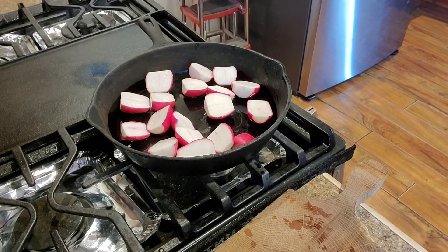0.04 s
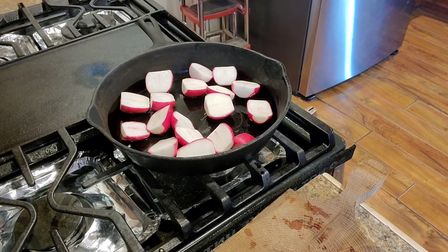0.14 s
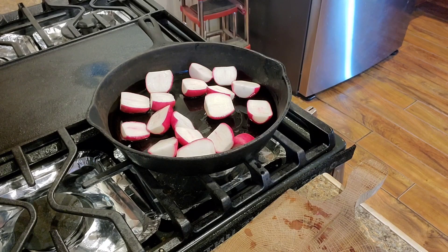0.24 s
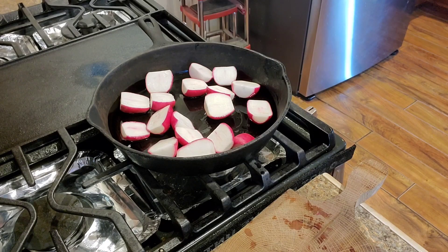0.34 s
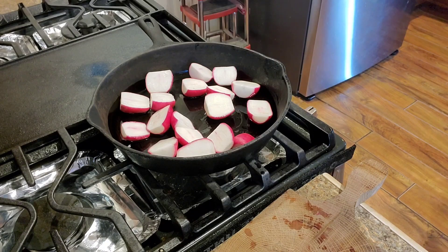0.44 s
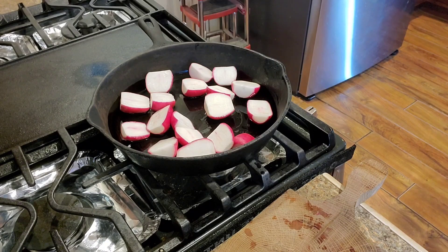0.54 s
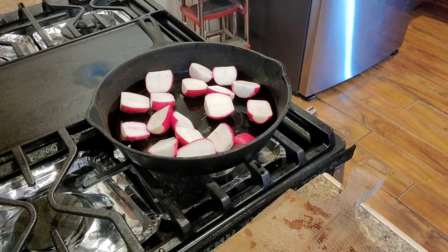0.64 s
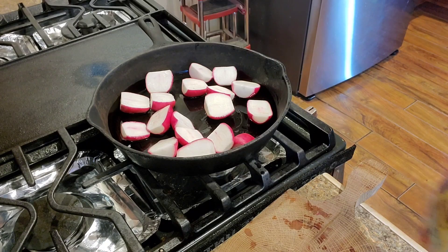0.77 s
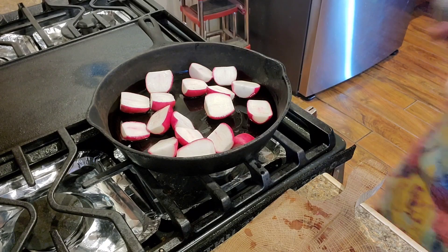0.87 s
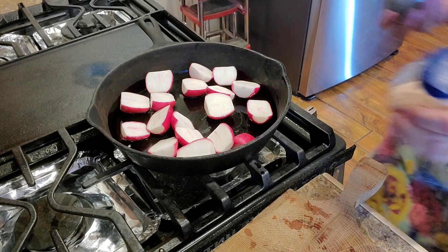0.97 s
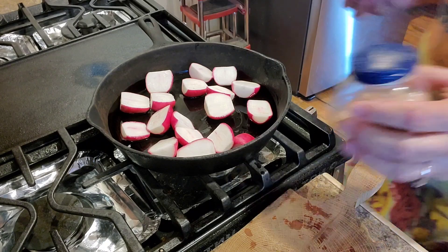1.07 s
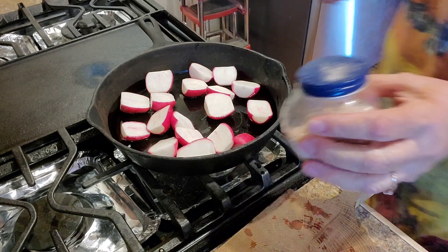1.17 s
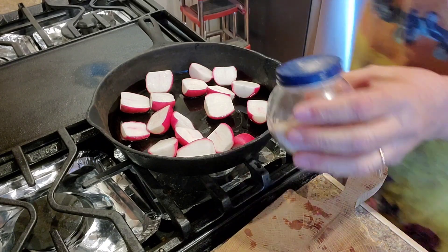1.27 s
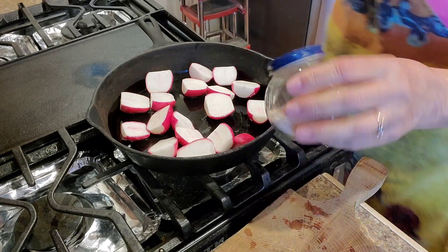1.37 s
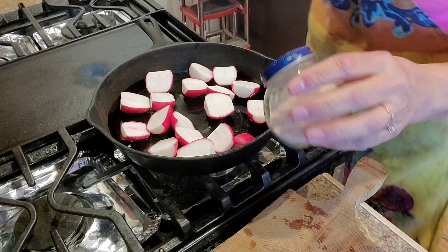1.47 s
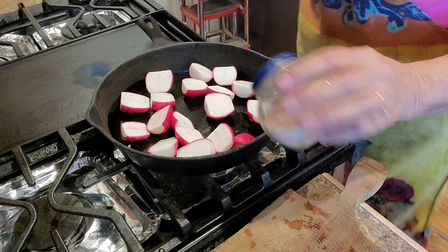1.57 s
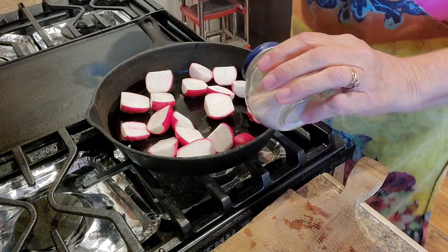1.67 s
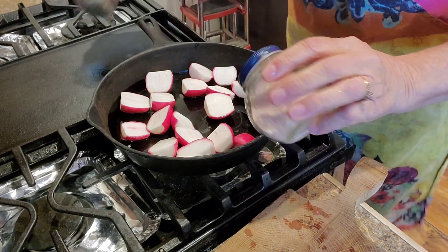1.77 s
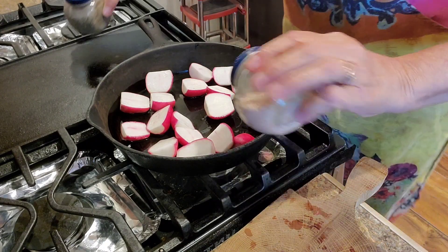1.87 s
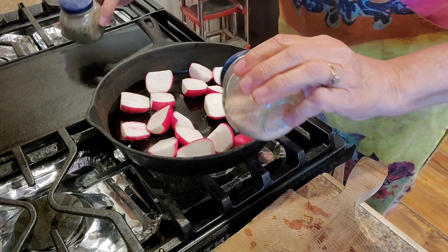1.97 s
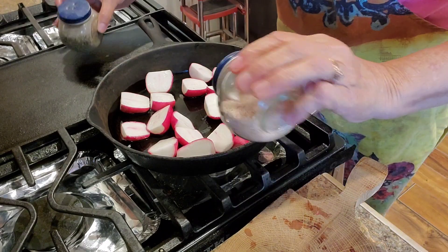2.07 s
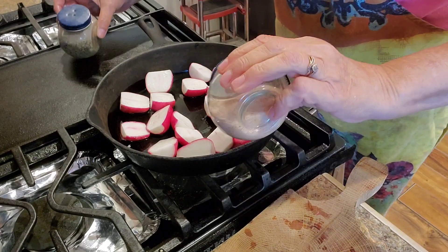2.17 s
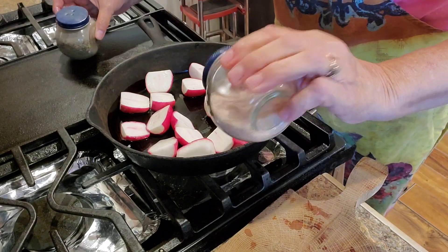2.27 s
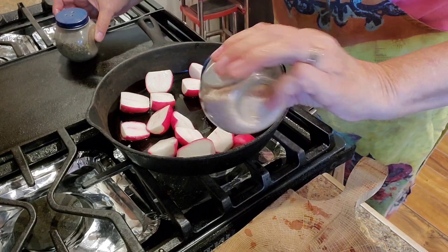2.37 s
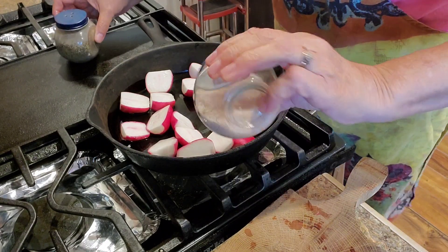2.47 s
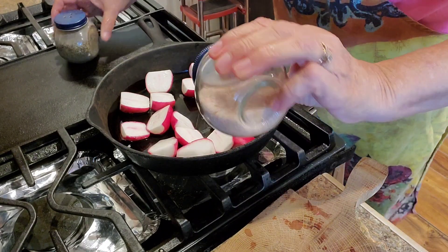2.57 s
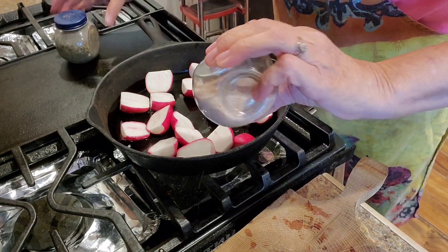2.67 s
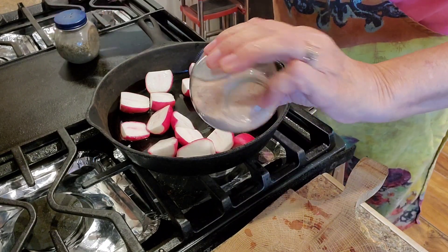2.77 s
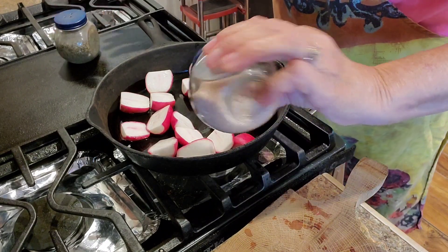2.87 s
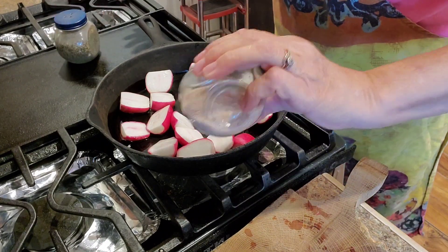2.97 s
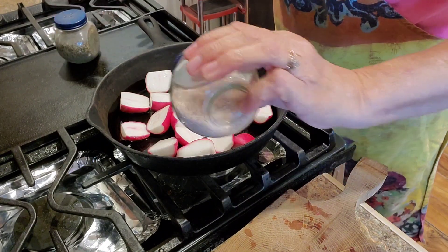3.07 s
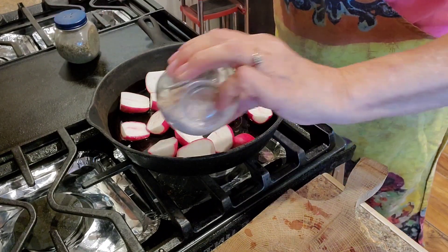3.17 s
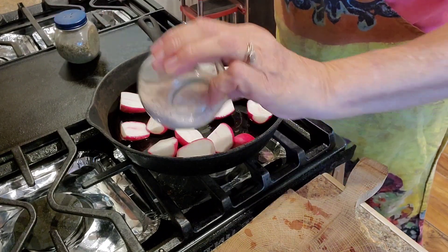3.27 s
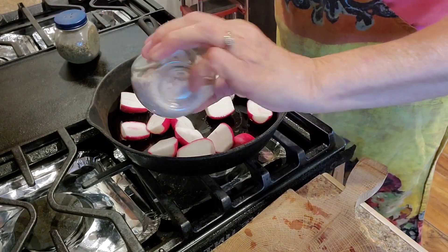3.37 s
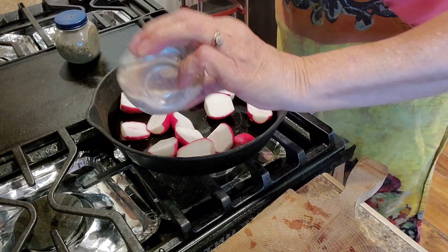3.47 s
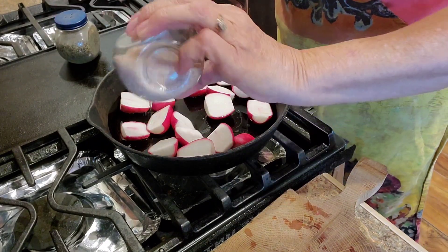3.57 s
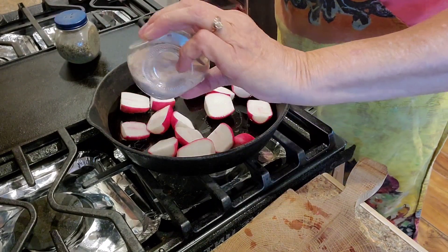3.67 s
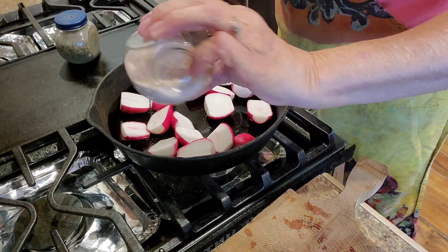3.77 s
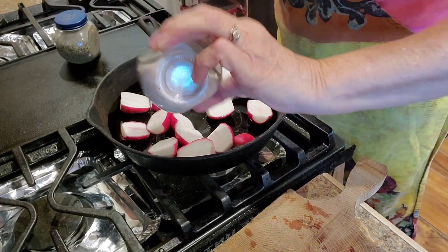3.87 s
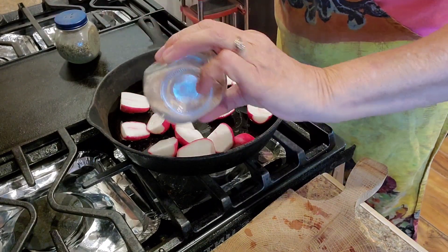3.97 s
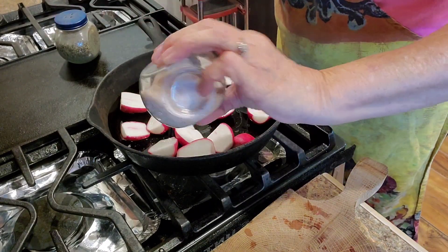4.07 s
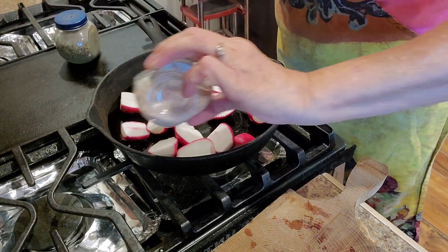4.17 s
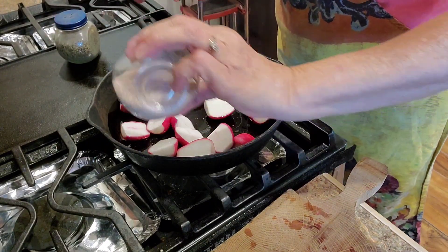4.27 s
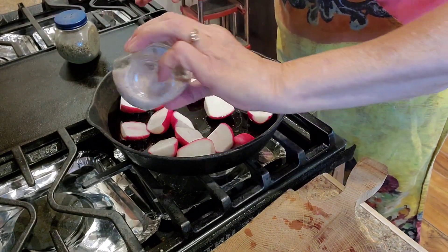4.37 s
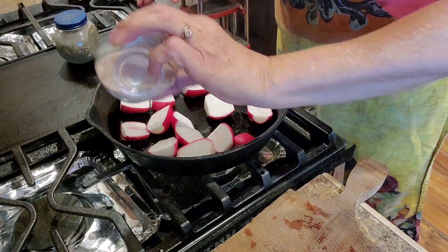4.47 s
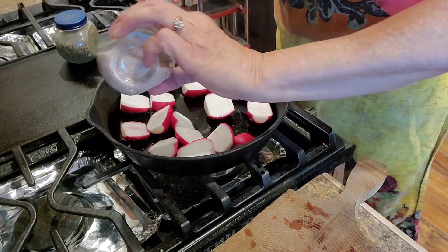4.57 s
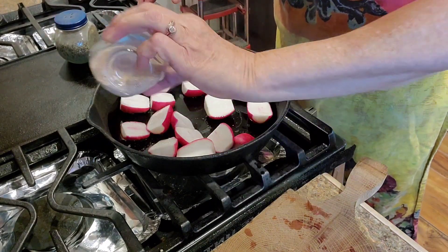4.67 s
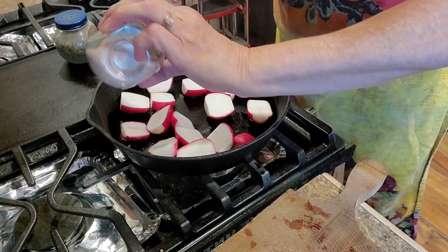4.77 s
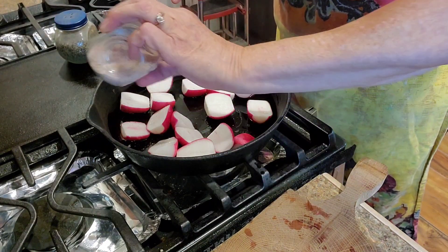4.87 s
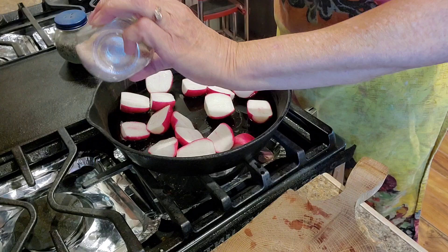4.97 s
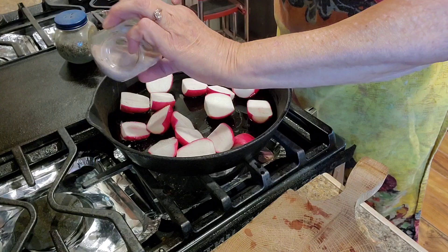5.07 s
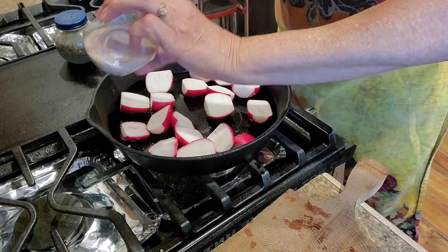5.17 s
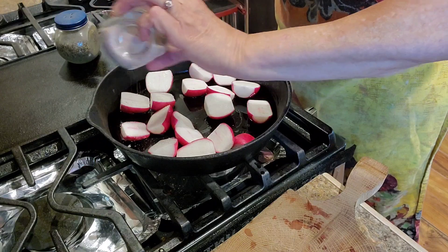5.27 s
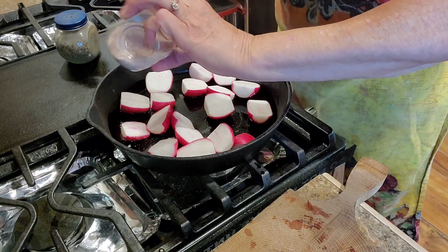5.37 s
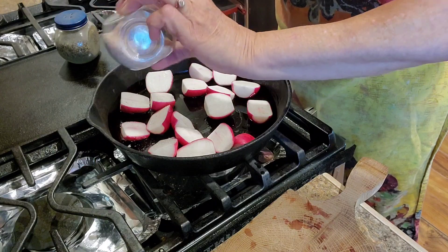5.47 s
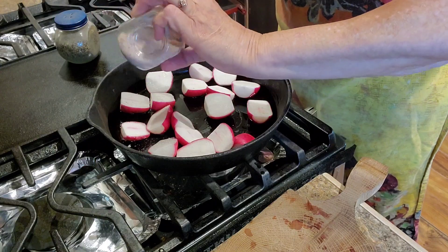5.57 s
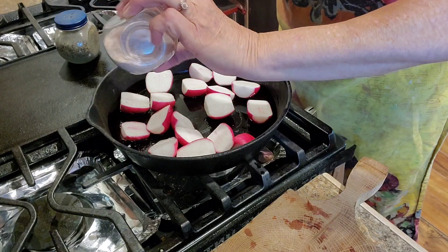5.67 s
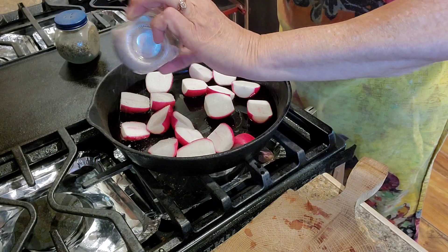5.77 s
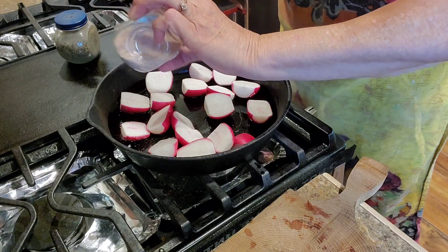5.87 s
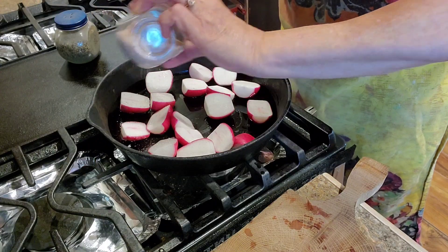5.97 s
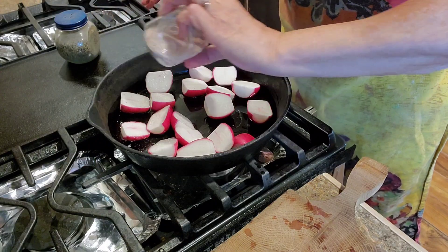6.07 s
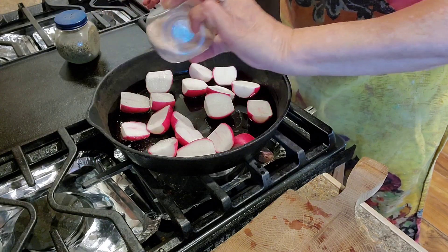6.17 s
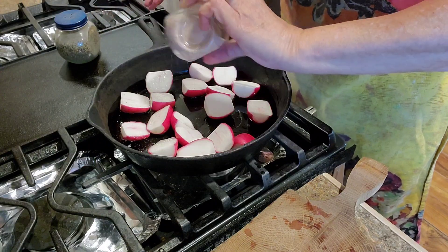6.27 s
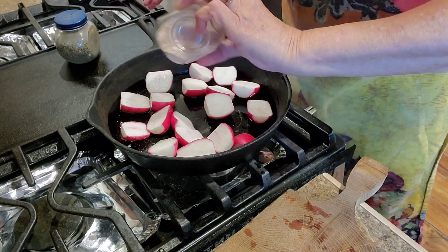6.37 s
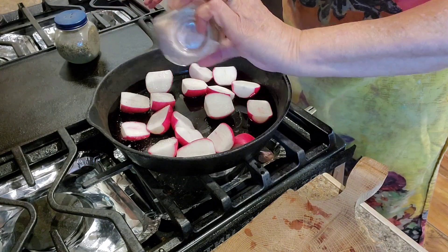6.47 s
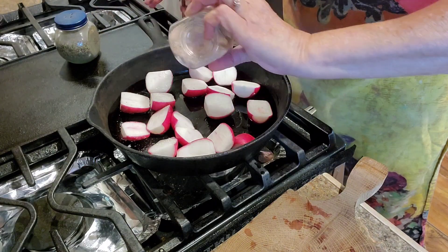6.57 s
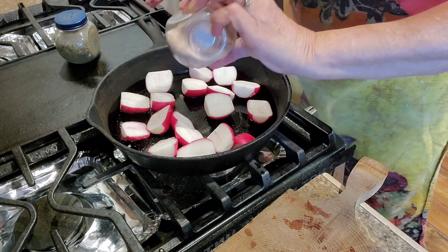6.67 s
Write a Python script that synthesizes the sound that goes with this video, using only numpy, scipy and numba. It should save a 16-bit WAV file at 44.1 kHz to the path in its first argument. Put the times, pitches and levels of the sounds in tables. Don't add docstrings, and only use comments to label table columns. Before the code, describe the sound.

Cupboard knocks and a latch click, then a glass jar of dry grains slides, a jar clanks hard on iron, and brisk rhythmic shaking follows.

```python
import sys
import numpy as np
from scipy import signal
from scipy.io import wavfile
from scipy.ndimage import uniform_filter1d
from numba import njit

SR = 44100
rng = np.random.default_rng(int(sys.argv[2]) if len(sys.argv) > 2 else 0)


def unload_wav(signal):
    wavfile.write(
        sys.argv[1],
        SR,
        np.round(np.clip(np.atleast_2d(signal).T, -1, 1) * 32767).astype(np.int16),
    )


def volts_from_decibels(level):
    exponent = np.asarray(level, float) / 20
    return 10 ** exponent


N = 296771
TIME = np.arange(N) / SR


def unit(x):
    return x / np.sqrt(np.mean(x ** 2))


def band(x, hz, width):
    return signal.lfilter(*signal.iirpeak(min(hz, .45 * SR), hz / width, fs=SR), x)


def resonances(x, peaks):
    return unit(sum(volts_from_decibels(db) * unit(band(band(x, hz, w), hz, w)) for hz, w, db in peaks))


def walk(rate):
    hold = int(SR / rate)
    steps = np.repeat(rng.standard_normal(N // hold + 1), hold)
    return uniform_filter1d(steps, hold)[:N]


def butter(x, order, hz, kind="low"):
    return signal.sosfilt(signal.butter(order, hz, kind, fs=SR, output="sos"), x)


# arrival_s, hold_s, first_db, last_db, air_minus_glass_db
SLIDES = [
    (1.215, 0.17, -35, -30, -36.5),
    (1.61, 0.19, -46, -47, -21),
    (1.772, 0.1, -35, -31.5, -26),
    (1.906, 0.035, -22, -26.5, -19),
]
# arrival_s, hold_s, first_db, last_db, air_minus_glass_db
SHAKES = [(2.138, 0.045, -25.5, -31.5, -22), (2.35, 0.041, -36.5, -26, 2.5), (2.608, .055, -39, -33, -19.5),
          (2.86, 0.046, -42, -33.5, -35), (2.925, 0.02, -35, -41, -38), (2.982, 0.011, -33.5, -36.5, -45),
          (3.048, 0.039, -39.5, -46, -42), (3.11, 0.055, -42.5, -35.5, -28),
          (3.165, 0.049, -39.5, -42, -33.5), (3.368, 0.064, -41.5, -42.5, -33.5),
          (3.6, 0.036, -31.5, -26.5, -14.5), (3.846, 0.08, -27, -33.5, -26.5),
          (4.106, 0.058, -22.5, -28.5, -19), (4.324, 0.063, -34, -23.5, -17),
          (4.572, 0.047, -24, -21, -16.5), (4.798, 0.047, -20, -24, -17), (5.02, 0.05, -26, -25, -16),
          (5.245, 0.046, -27, -26, -10.5), (5.464, 0.075, -33, -26, -14.5),
          (5.74, 0.046, -33, -26.5, -21.5), (6.0, 0.055, -30, -31, -17), (6.22, 0.069, -37.5, -27, -14),
          (6.465, 0.059, -24.5, -24, -12.5), (6.716, .014, -37.5, -32, -8.5)]
# throw_s, late_s, note_hz, rise_octaves, swell_db
AIR_NOTES = [(1.6, .009, 952, 0.17, -5), (2.14, 0.016, 834, 0.055, 2), (2.9, .005, 893, .1, 3),
             (3.6, 0.0052, 897, 0.063, -3.5), (3.85, 0.012, 865, 0.041, -4), (4.1, 0.0054, 881, 0.022, -8),
             (4.33, 0.0026, 903, 0.087, -5), (4.57, .002, 927, 0.097, 0), (4.8, .002, 827, .1, -9.5),
             (5.02, 0.011, 799, .02, -7.5), (5.25, 0.016, 857, .1, -2.5), (5.47, 0.016, 997, 0.28, 1.5),
             (5.74, 0.0099, 964, .2, -5), (6.0, 0.0054, 1054, 0.23, 0), (6.22, 0.027, 1112, 0.025, -8),
             (6.47, 0.021, 1031, .02, -8.5), (6.72, .005, 1034, .1, 0.5)]
# throw_s, ahead_s, under_throw_db
LEADS = [(1.2, 0.016, -16.5), (1.6, 0.028, -14.5), (1.77, .035, -7), (1.9, .02, -9), (2.14, 0.014, -24.5),
         (2.6, .015, -14), (2.86, .025, -10), (2.98, .03, -9.5), (3.05, .02, -8), (3.11, .03, -9),
         (3.37, .015, -8), (3.6, .015, -20), (3.85, 0.011, -20), (4.1, 0.015, -20.5), (4.33, .015, -17.5),
         (4.57, 0.022, -19.5), (4.8, 0.017, -21), (5.02, 0.019, -21), (5.25, 0.018, -17.5),
         (5.47, 0.0056, -21.5), (5.74, 0.021, -16.5), (6.0, 0.024, -16.5), (6.22, 0.018, -18.5),
         (6.47, .01, -18)]
SLIDE_ATTACK_S, SHAKE_ATTACK_S, ATTACK_DB = 0.086, 0.051, -52
SLIDE_RELEASE_S, SHAKE_RELEASE_S, RELEASE_DB = .09, 0.068, -32
TRICKLE_S, TRICKLE_DB = 0.017, -39
SETTLE_S, SETTLE_DB = .09, -55.5
PACKING_S, AIR_LAG_S = .07, 0.0058


def grain_flow():
    glass_db, air_db = np.full(N, -90.), np.full(N, -120.)
    note_hz = np.full(N, 900.)
    slides, shakes = (SLIDES, SLIDE_ATTACK_S, SLIDE_RELEASE_S), (SHAKES, SHAKE_ATTACK_S, SHAKE_RELEASE_S)
    for throws, attack_s, release_s in (slides, shakes):
        for s, hold_s, first_db, last_db, cavity_db in throws:
            _, late_s, hz, rise_oct, swell_db = min(AIR_NOTES, key=lambda row: abs(row[0] - s))
            _, ahead_s, ahead_db = min(LEADS, key=lambda row: abs(row[0] - s))
            times = s + np.cumsum([-ahead_s - attack_s / 2, attack_s / 2, ahead_s, hold_s,
                                   release_s, TRICKLE_S, SETTLE_S])
            levels = [first_db + ATTACK_DB, first_db + ahead_db, first_db, last_db,
                      last_db + RELEASE_DB, last_db + TRICKLE_DB, last_db + SETTLE_DB]
            throw_db = np.interp(TIME, times, levels, left=-90, right=-90)
            glass_db = np.maximum(glass_db, throw_db)
            packing = np.clip(2 * (TIME - s - late_s) / PACKING_S - 1, -1, 1)
            note_hz = np.where(TIME > times[0], hz * 2 ** (rise_oct * packing), note_hz)
            delays = [late_s, late_s, min(late_s, hold_s), AIR_LAG_S, AIR_LAG_S, AIR_LAG_S, AIR_LAG_S]
            answer_db = np.interp(TIME, times + delays, levels, left=-90, right=-90)
            air_db = np.maximum(air_db, cavity_db + swell_db * packing + answer_db)
    return glass_db, air_db - glass_db, note_hz


GRAINS_PER_S, GRAIN_SPREAD_DB = 8100, 0.5


def grain_ticks(tumble):
    fall, size = rng.random(N), rng.exponential(size=N)
    size_db = GRAIN_SPREAD_DB * size + 1.4 * walk(220) + 1.2 * walk(70)
    ticks = (fall < GRAINS_PER_S / SR) * volts_from_decibels(tumble * size_db)
    return ticks / np.sqrt(uniform_filter1d(ticks ** 2, size=SR // 8))


# pitch_hz, width_hz, level_db
GLASS = [(4320, 1100, -8.5), (4675, 970, -3.5), (5340, 1500, -5.5), (6470, 1900, 3), (7900, 2100, 4),
         (9170, 1100, 1), (10440, 2800, -4.5), (11900, 1800, -12.5), (13500, 1300, -22.5)]
# pitch_hz, width_hz, level_db
LID = [(2863, 310, 9), (3277, 640, 15.5)]
# hit_s, peak_db
LUMPS = [(1.894, -12.0), (1.9068, -10), (1.9156, -6.5), (1.931, -9), (1.9449, -15), (2.1374, -14.5),
         (2.1421, -13.5), (2.1577, -5.5), (2.1853, -10), (2.649, -12), (2.872, -25.5), (2.8909, -20),
         (2.8995, -15.5), (2.933, -16.5), (2.9856, -21.5), (3.1538, -18.5), (3.1702, -18.5), (3.2093, -21),
         (3.4325, -23), (3.6077, -12), (3.6178, -13), (3.6319, -11.5), (3.653, -18), (3.8425, -18.5),
         (3.86, -16), (4.1, -9), (4.1117, -11), (4.1439, -13.5), (4.3319, -15.5), (4.3516, -6),
         (4.3628, -8), (4.3758, -13), (4.3835, -15.5), (4.4044, -7.5), (4.4095, -19), (4.579, -14),
         (4.5919, -8.5), (4.6384, -13), (4.7971, -14), (4.8512, -12.5), (5.0139, -12.5), (5.0344, -5.5),
         (5.0414, -16), (5.0499, -11.5), (5.0595, -10.5), (5.267, -10.5), (5.269, -8.5), (5.2847, -14),
         (5.499, -12.5), (5.5254, -10.5), (5.7471, -23), (5.757, -15), (6.0014, -16.5), (6.0129, -10),
         (6.2249, -22.5), (6.2471, -12.5), (6.2704, -14), (6.4725, -6), (6.5138, -12.5), (6.5296, -11.5)]
LUMP_TOP_DB = -7


def large_grains(lid_db):
    hits = np.zeros(N)
    for s, db in LUMPS:
        hits[int(s * SR)] = volts_from_decibels(db)
    bursts = signal.fftconvolve(hits, np.exp(-TIME[:300] / .0011))[:N]
    bursts = bursts * np.sign(rng.standard_normal(N))
    out = 0
    for k, (hz, w, peak_db) in enumerate(GLASS + LID):
        lid_share = volts_from_decibels(lid_db - 8.0) if k >= len(GLASS) else 1
        gain = (-1) ** k * volts_from_decibels(peak_db + LUMP_TOP_DB * (hz > 10000)) * lid_share
        out = out + gain * band(band(bursts, hz, w), hz, w)
    return out


# pitch_hz, width_hz, level_db
RINGS = [(2960, 60, -16), (3220, 80, -12), (4400, 90, -11), (6500, 70, -14), (7550, 60, -12),
         (7750, 50, -13), (8040, 60, -13), (9440, 80, -15)]
# pitch_hz, width_hz, level_db
WALL = [(2500, 400, 0)]
# pitch_hz, width_hz, level_db
BASE = [(1904, 350, 0.5), (1660, 1200, -6)]
# pitch_hz, width_hz, level_db
CAVITY = [(520, 150, -17), (660, 130, 0), (760, 130, 0), (870, 130, 0), (990, 140, 0), (1130, 150, 0),
          (1270, 130, -3)]
# time_s, lid_minus_glass_db, wall_minus_lid_db
AIM = [(1.14, -10.5, -20.5), (1.175, 26, -24), (1.224, -6, -16), (1.31, -7.5, -3.5), (1.44, -7, -5),
       (1.559, -28, -21.5), (1.64, -29.5, -41), (1.732, 1, -2), (1.82, -5.5, 4.5), (1.96, -9.5, -1.5),
       (2.14, -16.5, -22), (2.9, -18.5, -29.5), (3.4, -28, -29), (3.6, -13, -5), (3.9, -14, -12.5),
       (4.5, -12, -10), (5.5, -8.5, -2.5), (6.73, -9, -5.5)]
# time_s, share_of_slide_tilt
DULLNESS = [(1.2, 0.5), (1.38, .4), (1.55, 1.3), (1.78, 1.1), (1.9, 0)]
WALL_LAG_S, BASE_LAG_S, BASE_DB = .032, 0.045, -3.5
LOOSE_FROM_S, SLIDE_LOOSENESS = 1.885, .3
SLIDE_TILT_DB = -31
SOFT_TILT_DB, SOFT_BELOW_DB = -9.5, -28.5
SOFT_FOOT_DB = -1
PATCHY_DB = 3.5
CAVITY_GLIDE_DB = 110


def shaker():
    glass_db, air_db, note_hz = grain_flow()
    s, *columns = np.transpose(AIM)
    lid_db, share_db = (np.interp(TIME, s, c) for c in columns)

    def late_db(lag_s):
        delayed_db = np.interp(TIME - lag_s, TIME, glass_db)
        return np.minimum(delayed_db - glass_db, 3.0) + lid_db + share_db

    tumble = np.where(TIME < LOOSE_FROM_S, SLIDE_LOOSENESS, 1)
    ticks = grain_ticks(tumble)
    soft = np.clip((SOFT_BELOW_DB - glass_db) / 20, 0, 1)
    tilt_db = SLIDE_TILT_DB * np.interp(TIME, *np.transpose(DULLNESS)) + SOFT_TILT_DB * soft
    parts = ((GLASS + RINGS, 0), (LID, lid_db), (WALL, late_db(WALL_LAG_S)),
             (BASE, late_db(BASE_LAG_S) + BASE_DB), (CAVITY, air_db))
    pelting = 0
    for peaks, db in parts:
        is_air = peaks is CAVITY
        layer = 0
        for hz, w, peak_db in peaks:
            level_db = peak_db + tilt_db * max(np.log2(hz / 9000), 0)
            if not is_air:
                level_db = level_db + SOFT_FOOT_DB * soft * tumble * max(np.log2(7500 / hz), 0)
            elif hz > 600:
                off_oct = np.log2(hz / note_hz)
                level_db = level_db - np.minimum(CAVITY_GLIDE_DB * off_oct ** 2, CAVITY_GLIDE_DB / 4)
            flicker_db = (1.5 if is_air else 2.6) * walk(18) + PATCHY_DB * walk(70)
            spot = rng.standard_normal(N)
            layer = layer + volts_from_decibels(level_db + tumble * flicker_db) * resonances(ticks * spot, [(hz, w, 0)])
        pelting = pelting + volts_from_decibels(db) * unit(layer)
    return pelting * volts_from_decibels(glass_db) + volts_from_decibels(-1.0) * large_grains(lid_db)


def knocks(modes, blows, contact_ms, rough, strike=0.78):
    out, t = np.zeros(N + SR), np.arange(SR // 2) / SR
    for s, db, chatter_ms, rattle_db, rattle_hz in blows:
        envelope = np.exp(-t * 1000 / chatter_ms) * (1 - np.exp(-t * 1000 / (6 * contact_ms)))
        push = rng.standard_normal(len(t)) * envelope
        push[1] += strike * np.sqrt(np.sum(push ** 2)) / 2
        body = 0
        for hz, level_db, t60 in modes:
            decaying_tone = np.sin(2 * np.pi * hz * t) * 1000. ** (-t / t60)
            ring = signal.fftconvolve(push, decaying_tone)[:len(t)]
            flutter = uniform_filter1d(rng.standard_normal(len(t)), size=SR // 90) * np.sqrt(SR // 90)
            softness = np.hypot(1, 2 * np.pi * hz * contact_ms / 1000)
            body = body + volts_from_decibels(level_db) / softness * ring / np.abs(ring).max() * (1 + rough * flutter)
        rattle = rng.standard_normal(len(t)) * envelope ** 0.63
        for _ in range(3):
            rattle = band(rattle, rattle_hz, 0.52 * rattle_hz)
        knock = body / np.std(body[:2000]) + volts_from_decibels(rattle_db) * rattle / np.std(rattle[:2000])
        i = int(s * SR)
        out[i:i + len(t)] += volts_from_decibels(db) * knock
    return out[:N]


# hit_s, peak_db, pitch_hz, width_hz
CRACKS = [(.2865, -18.5, 910, 570), (0.3568, -8, 2500, 510), (0.357, -10, 6834, 1200),
          (0.3567, -23, 995, 360), (.364, -22.5, 1028, 16), (.3615, -30, 2405, 1200),
          (0.4553, -12, 894, 300), (.4615, -10.5, 696, 100), (.4655, -1, 385.3, 180),
          (0.8334, -42, 970, 2100), (0.834, -27, 1020, 46), (2.3599, -0.5, 2610, 2170),
          (2.5245, -11, 803, 220), (2.53, -17, 600, 9.7), (2.53, -15, 467, 13.6), (2.57, -21, 300, 21),
          (2.594, -14.5, 430, 67), (2.5245, -25.5, 1200, 20), (2.5255, -31, 3445, 340),
          (2.56, -18.5, 528.8, 45), (2.7155, -10.5, 450, 43), (2.728, -18, 500, 40), (2.739, -17, 450, 54),
          (2.716, -19.5, 565, 16.6), (4.797, -47, 804, 33), (4.818, -30, 868, 27), (4.725, -35, 504.6, 11),
          (4.758, -36, 500, 10), (4.703, -36, 637, 37), (4.72, -39.5, 745, 7.9), (4.722, -48, 1120, 10),
          (4.815, -37, 1106, 16), (4.84, -39, 750.6, 24), (4.86, -58, 525, 12), (.288, -26.5, 260.5, 22),
          (1.378, -37, 263.4, 120)]


def cracks():
    out, t = np.zeros(N + SR), TIME[:SR // 20]
    for s, db, hz, w in CRACKS:
        fade = np.exp(-np.pi * w * t) * (1 - np.exp(-4 * hz * t))
        i = int(s * SR)
        out[i:i + len(t)] += volts_from_decibels(db) * 2 * np.sin(2 * np.pi * hz * t) * fade
    return out[:N]


GRIDDLE_HZ = [310, 565, 1180, 1576, 1952, 2204, 2490, 2787, 3554, 3650, 4394, 4455, 4683, 6767]
# level_db, fade_s (time to fall 60 dB)
GRIDDLE_RING = [(-2, 0.28), (-3, 0.12), (-4, 0.64), (-4.5, 0.24), (0, 0.38), (-4.5, 0.2), (-10, 0.35),
                (3, 0.27), (-2.5, 0.3), (-10, .15), (-2.5, 0.18), (-8.5, .15), (-13.5, 0.21), (-9, 0.2)]
# hit_s, level_db, chatter_ms, rattle_db, rattle_hz
GRIDDLE_BLOWS = [
    (2.359, -9, 22.7, -7.5, 2606),
    (2.527, -37.5, 14, -1, 3000),
]
# pitch_hz, level_db, fade_s
GRATE = [(309, -2, 0.3), (430, -1.5, .25), (467, 3.5, 0.24), (502, -0.5, 0.2), (600, 2, 0.31),
         (734, -14.5, .3), (854, -7, 0.32), (1040, -6, 0.15), (1145, -5, .25), (1277, -4, 0.2),
         (1570, -13, 0.15), (2010, -20, 0.32)]
# hit_s, level_db, chatter_ms, rattle_db, rattle_hz
GRATE_BLOWS = [(2.359, -13, 30, -3.5, 1069), (2.49, -28.5, 25, 3, 463.5), (2.524, -27.5, 9, 3, 500),
               (2.558, -20.5, 14, -6.5, 890), (2.593, -29.5, 12, -1, 499), (2.68, -39, 20, 3, 330),
               (2.704, -30.5, 15, 7.5, 442), (2.7149, -22.5, 16.7, -0.5, 1101)]
# pitch_hz, level_db, fade_s
SETTLED = [(565, -0.5, 0.32), (810, -3.5, .26), (1090, -4.5, 0.23), (1580, -4.5, .14), (1960, -0.5, 0.22),
           (2086, 4.5, 0.18), (2229, -8.5, 0.2), (2630, -7, 0.18), (3572, -10.5, .12)]
# hit_s, level_db, chatter_ms, rattle_db, rattle_hz
SETTLED_BLOWS = [(2.713, -25, 14, -10.5, 2330)]
KNOCK_FOOT_HZ, IRON_TOP_HZ = 210, 8000


def iron():
    griddle = [(hz, *ring) for hz, ring in zip(GRIDDLE_HZ, GRIDDLE_RING)]
    out = knocks(griddle, GRIDDLE_BLOWS, contact_ms=0.079, rough=0.3, strike=3.0)
    out += knocks(GRATE, GRATE_BLOWS, contact_ms=0.23, rough=0.6, strike=1.4)
    out += knocks(SETTLED, SETTLED_BLOWS, contact_ms=0.044, rough=0.3, strike=3.3)
    return butter(out + cracks(), 3, [KNOCK_FOOT_HZ, IRON_TOP_HZ], "band")


# pitch_hz, level_db, fade_s
LATCH = [(822, -1.5, 0.33), (1028, 9.5, 0.14), (2142, -4, 0.11), (2530, -5.5, 0.07), (2740, -7.5, 0.074),
         (5444, -15.5, 0.12), (6030, -2, .066), (6540, -7.5, 0.11), (6848, -3.5, 0.11), (7170, -5.5, 0.19)]
# hit_s, level_db, chatter_ms, rattle_db, rattle_hz
LATCH_BLOWS = [(.3565, -19, 10, -5, 2300), (.356, -49.5, 17, 19, 6500), (0.455, -55.5, 19, 16.5, 6620),
               (0.455, -55.5, 9.4, 8, 3000), (0.833, -66, 28, 13.5, 3200)]
# pitch_hz, level_db, fade_s
DOOR = [(310, 0.5, 0.23), (437.6, 8, 0.21), (559.3, 4, 0.23), (695, -0.5, 0.27), (802, 6.5, 0.099),
        (865, 6, 0.28), (980, -10.5, .35), (1082, 3.5, 0.2), (1260, -6, 0.27)]
# hit_s, level_db, chatter_ms, rattle_db, rattle_hz
DOOR_BLOWS = [(0.4541, -21.5, 6.8, -0.5, 898), (0.4615, -18, 11, -10.5, 500), (.466, -30.5, 18, 7, 600),
              (4.7, -42.5, 25, -2, 657), (4.79, -37.5, 14, 2.5, 616), (5.552, -52.5, 21, 1.5, 474),
              (3.55, -56, 60, -1.5, 500)]
# pitch_hz, level_db, fade_s
DRAWER = [(115, 7.5, 0.14), (222.5, -12.5, 0.26), (300, -6.5, 0.42), (415, 1.5, 0.027), (533.4, 4.5, 0.017)]
# hit_s, level_db, chatter_ms, rattle_db, rattle_hz
DRAWER_BLOWS = [(0.222, -49.5, 51, -4, 950), (.286, -25.5, 27.5, -9, 760), (0.289, -59.5, 60, 12, 2780),
                (.832, -29.5, 23, -4, 800)]
# hit_s, level_db, chatter_ms, rattle_db, rattle_hz
SOFT_BLOWS = [(1.301, -47.5, 36, 10.5, 200), (1.379, -34.5, 8.6, 6.5, 183.8), (4.703, -35.5, 35, -15, 200)]
FAR_TOP_HZ = 7860


def cupboards():
    out = knocks(LATCH, LATCH_BLOWS, contact_ms=0.03, rough=0.5, strike=1.2)
    out += knocks(DOOR, DOOR_BLOWS, contact_ms=0.5, rough=0.97)
    out += knocks(DRAWER, DRAWER_BLOWS, contact_ms=0.32, rough=0.31)
    out += knocks(DRAWER, SOFT_BLOWS, contact_ms=1.5, rough=0.73)
    return butter(out, 4, FAR_TOP_HZ)


# start_s, length_s, upper_hz, level_db, lower_minus_upper_db
SQUEAKS = [
    (4.93, .2, 1600, -58, -20),
    (5.1, .45, 1650, -58, 0),
    (5.66, .3, 1500, -70, -20),
    (5.96, .22, 1465, -61, -25),
    (6.07, .22, 1455, -53, -25),
]
SQUEAK_SAG_HZ_PER_S = 120


def hinge():
    out = 0
    for start, length, hz, db, low_db in SQUEAKS:
        age = np.clip(TIME - start, 0, length)
        waver = 1 + .015 * walk(120) + .012 * walk(9)
        phase = np.pi * np.cumsum((hz - SQUEAK_SAG_HZ_PER_S * age) * waver) / SR
        flutter_db = 3.5 * walk(70) + 2 * walk(250) - 4
        tone = np.sin(2 * phase) + volts_from_decibels(low_db) * np.sin(phase)
        swell = np.sqrt(2) * np.abs(np.sin(np.pi * age / length))
        out = out + swell * volts_from_decibels(db + flutter_db) * tone
    return out


# start_s, end_s, pitch_hz, width_hz,
# level_db
RUBS = [(-.1, .22, 900, 600, -63), (.62, .84, 1040, 130, -42), (.61, .84, 3650, 220, -59),
        (.66, .9, 3000, 600, -66), (.63, .74, 5400, 600, -65), (.69, .9, 4750, 500, -64),
        (.61, .76, 7000, 1500, -59.5), (.9, 1.09, 5000, 900, -65), (2.94, 3.1, 1850, 400, -68),
        (4.58, 4.71, 600, 30, -48), (4.65, 4.78, 6300, 500, -58), (4.64, 4.8, 8500, 5000, -62),
        (3.99, 4.09, 8000, 4000, -57), (1.535, 1.63, 5100, 600, -48), (1.54, 1.63, 6500, 700, -50),
        (6.58, 6.68, 6400, 700, -62), (5.84, 5.96, 6400, 500, -65), (3.25, 3.3, 8000, 2500, -68),
        (1.59, 1.72, 1500, 500, -58.5), (4.68, 4.79, 1950, 200, -65), (1.28, 1.45, 1250, 350, -45),
        (1.8, 1.99, 1250, 500, -43.5), (4.67, 4.92, 500, 150, -43.5), (4.69, 4.8, 900, 500, -50.5),
        (.78, .9, 8200, 1000, -66.5), (2.75, 3.09, 560, 50, -62.5), (-.1, .15, 370, 120, -63.5),
        (4.2, 7.5, 6400, 500, -72), (4.6, 7.5, 3100, 300, -76), (.25, .34, 7000, 800, -63),
        (4.3, 8, 800, 900, -77), (3.6, 8, 11000, 4000, -77)]
RUB_FLICKER_DB = 3


def rubbing():
    out = 0
    for start, end, hz, w, db in RUBS:
        progress = np.clip((TIME - start) / (end - start), 0, 1)
        swell = np.abs(np.sin(np.pi * progress)) ** .6
        hiss = resonances(rng.standard_normal(N), [(hz, w, 0)])
        out = out + volts_from_decibels(db + RUB_FLICKER_DB * walk(60)) * swell * hiss
    return out


# pitch_hz, width_hz, level_db
HUM = [(57.27, 4.5, 16.5), (40, 24, -9)]
# pitch_hz, width_hz, level_db
BOARDS = [(105, 80, -0.5), (175, 17, 0.5), (200, 99, -4)]
# step_s, hum_band_db, floorboard_db
STEPS = [(0.01, -75, -57.5), (0.299, -32.5, -32), (.87, -47, -31), (0.931, -34, -43), (1.05, -45.5, -47),
         (1.218, -33.5, -41), (1.407, -34.5, -44.5), (1.539, -48, -48.5), (1.773, -26.5, -52),
         (2.33, -45, -47), (3.65, -41, -63), (4.1, -39.5, -51), (4.72, -43, -45), (6.28, -42.5, -54.5)]
# time_s, gain_db
GATE = [
    (0.0, -27),
    (.2, -11.5),
    (.3, -0.5),
    (2.4, 0.5),
    (3.05, -5),
    (3.5, -9.5),
    (3.6, 1),
]
# pitch_hz, level_db_per_hz
AIR = [(176, -3), (383, -26), (833, -21.5), (2130, -57.5), (3090, -33), (7090, -26), (15000, -45)]
AIR_DB, HUM_DB, BOARD_DB = -71.5, -51, -59.5
STEP_RISE_DB_PER_S, STEP_FALL_DB_PER_S = 480, 140.5


def kitchen():
    gate_db = np.interp(TIME, *np.transpose(GATE))
    hum_db, board_db = HUM_DB + gate_db, BOARD_DB + gate_db
    for s, step_hum_db, step_board_db in STEPS:
        fade_db = np.minimum(STEP_RISE_DB_PER_S * (TIME - s), STEP_FALL_DB_PER_S * (s - TIME))
        hum_db = np.maximum(hum_db, step_hum_db + fade_db)
        board_db = np.maximum(board_db, step_board_db + fade_db)
    out = volts_from_decibels(hum_db) * resonances(rng.standard_normal(N), HUM)
    out += volts_from_decibels(board_db) * resonances(rng.standard_normal(N), BOARDS)
    hz, db = np.transpose(AIR)
    bed = 0
    for f in 250 * 2 ** np.arange(0, 6, .5):
        level_db = np.interp(np.log(f), np.log(hz), db) + 10 * np.log10(f) + 2.0 * walk(24)
        bed = bed + volts_from_decibels(level_db) * resonances(rng.standard_normal(N), [(f, f / 2, 0)])
    return out + volts_from_decibels(AIR_DB) * unit(bed)


@njit
def walls(x, lags, gain, damp):
    line, soft, out = np.zeros((8, 4096)), np.zeros(8), np.zeros(len(x))
    for i in range(len(x)):
        total = 0.
        for k in range(8):
            soft[k] += (1 - damp) * (gain[k] * line[k, (i - lags[k]) & 4095] - soft[k])
            total += soft[k]
            out[i] += soft[k] * (1 - 2 * (k % 2))
        for k in range(8):
            line[k, i & 4095] = x[i] + soft[k] - total / 4
    return out


ROOM_T60_S, ROOM_DAMP, ROOM_DB = 0.059, 0.93, -34.5
MIC_FOOT_HZ = 36.2
SIDE_DB, SIDE_TOP_DB, SIDE_TOP_HZ = -36.5, -37, 500


def scene():
    near = shaker() + iron()
    far = cupboards() + hinge() + rubbing()
    lags = rng.integers(400, 1900, 8)
    room = walls(near + volts_from_decibels(14.5) * far, lags, volts_from_decibels(-60 * lags / SR / ROOM_T60_S), ROOM_DAMP)
    mid = near + far + volts_from_decibels(ROOM_DB) * room + kitchen()
    mid = butter(mid, 4, MIC_FOOT_HZ, "high")
    top = butter(mid, 2, SIDE_TOP_HZ, "high")
    side = (volts_from_decibels(SIDE_DB) * mid + volts_from_decibels(SIDE_TOP_DB) * top) * np.sign(walk(150))
    return np.array([mid + side, mid - side])


def band_limit(x):
    return signal.sosfilt(signal.butter(12, 15520, fs=SR, output="sos"), x)


def record(dry):
    top_cut = signal.ellip(8, .2, 60, 15300, fs=SR, output="sos")
    mix = signal.sosfilt(top_cut, np.clip(dry, -1, 1))
    return band_limit(mix)


dry = scene()
out = record(dry)
unload_wav(out)
```